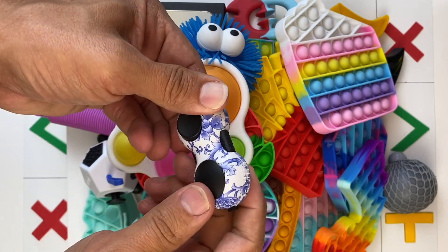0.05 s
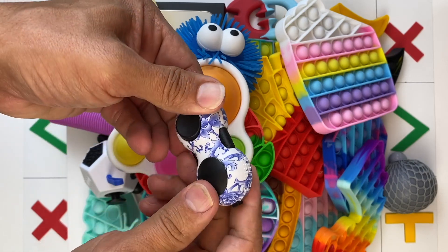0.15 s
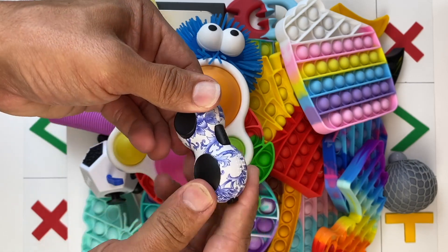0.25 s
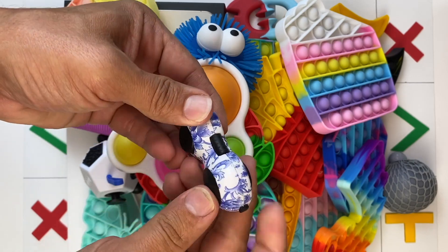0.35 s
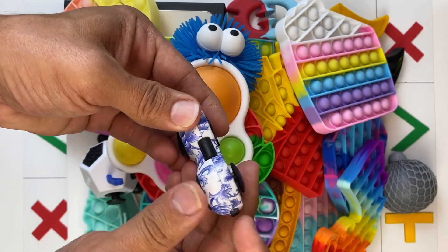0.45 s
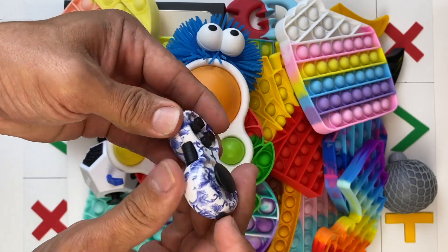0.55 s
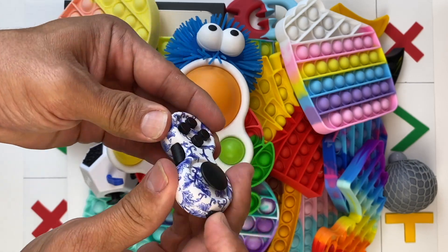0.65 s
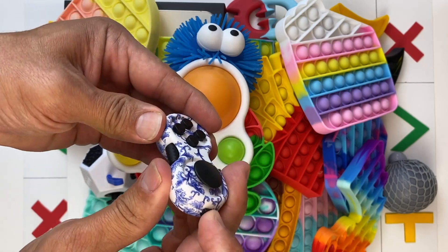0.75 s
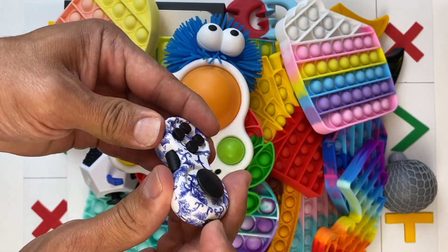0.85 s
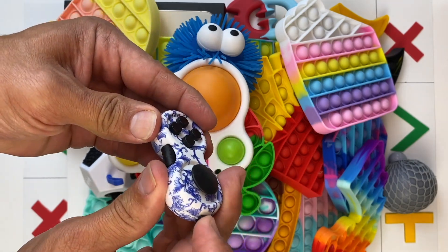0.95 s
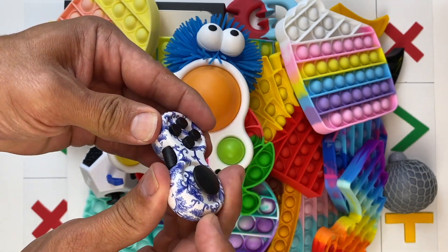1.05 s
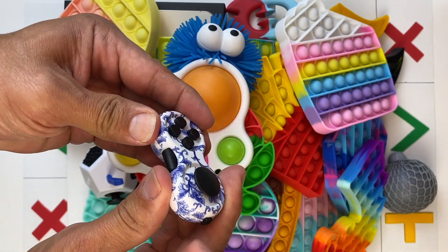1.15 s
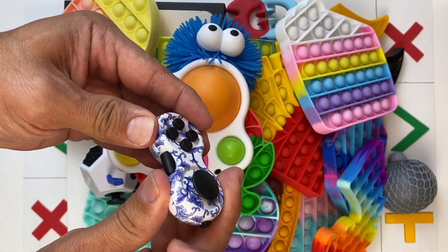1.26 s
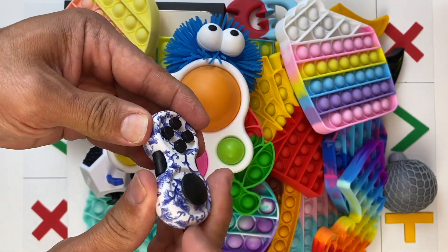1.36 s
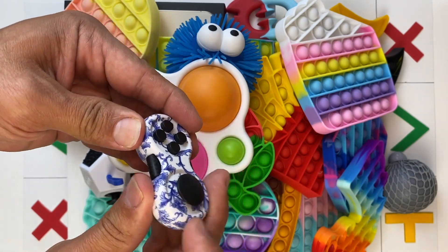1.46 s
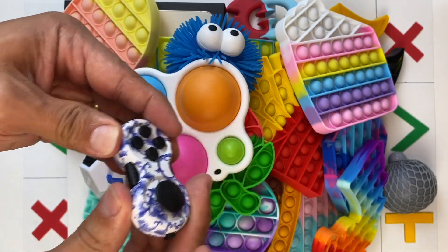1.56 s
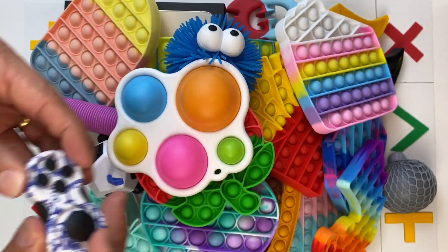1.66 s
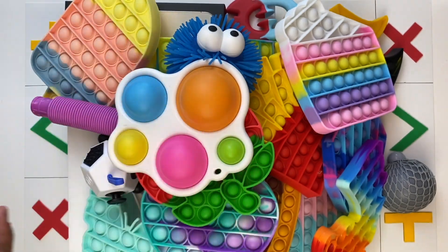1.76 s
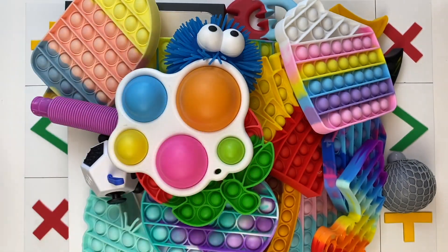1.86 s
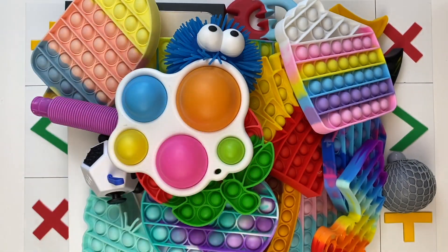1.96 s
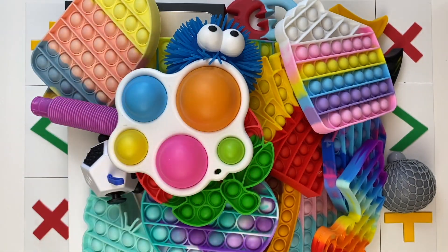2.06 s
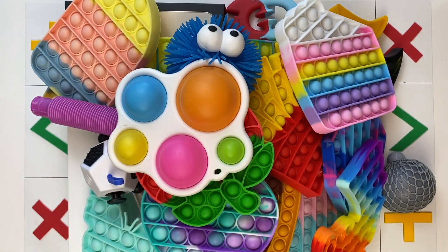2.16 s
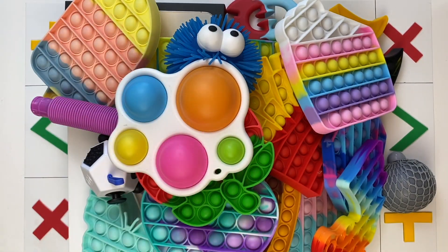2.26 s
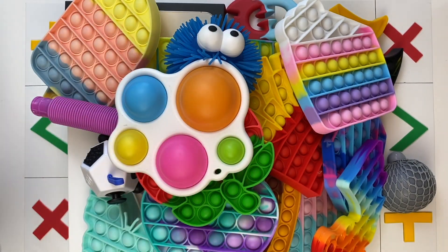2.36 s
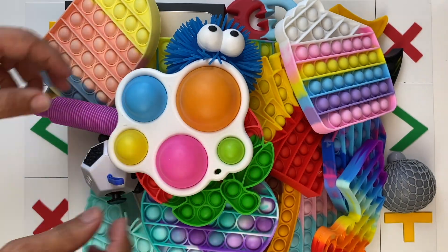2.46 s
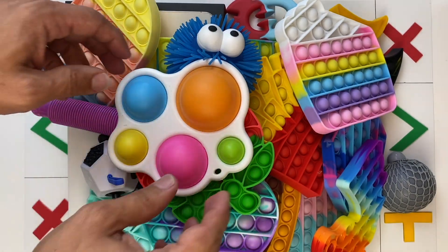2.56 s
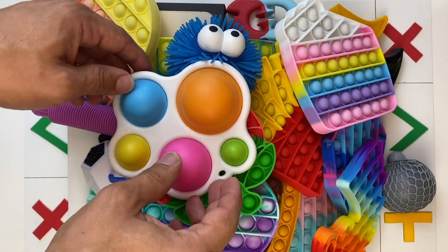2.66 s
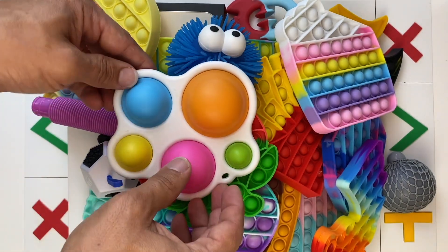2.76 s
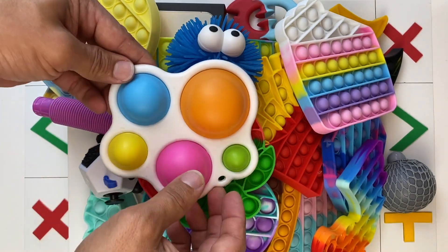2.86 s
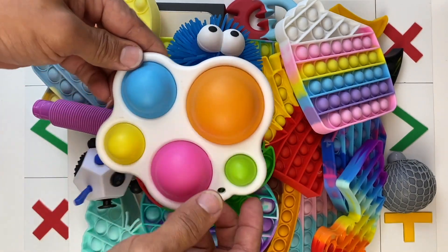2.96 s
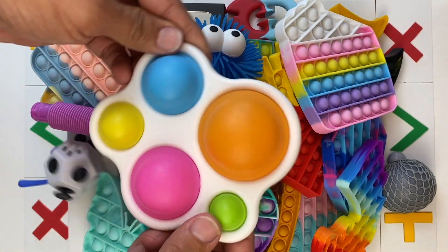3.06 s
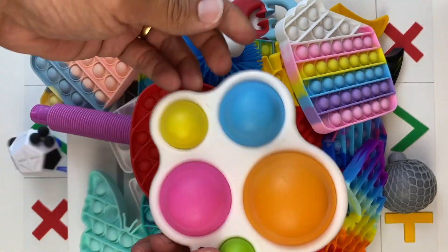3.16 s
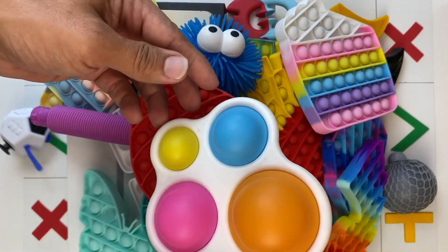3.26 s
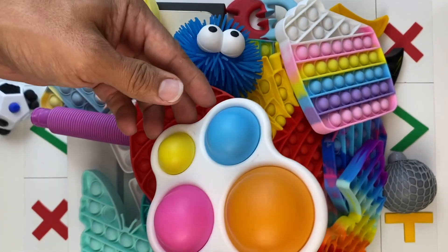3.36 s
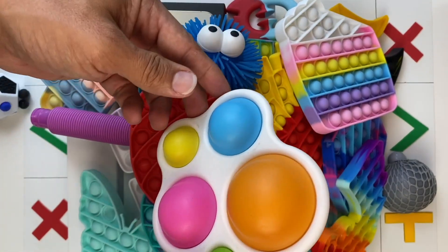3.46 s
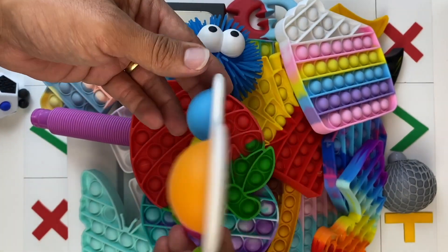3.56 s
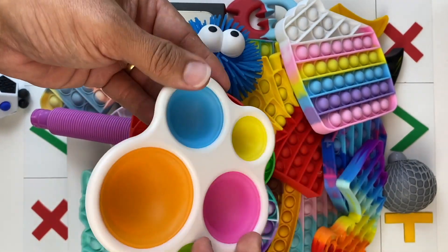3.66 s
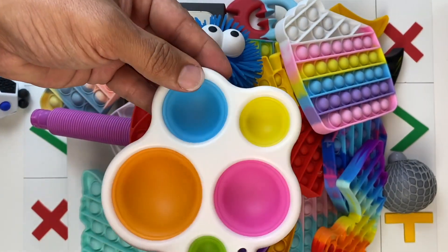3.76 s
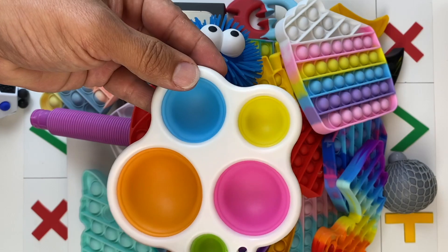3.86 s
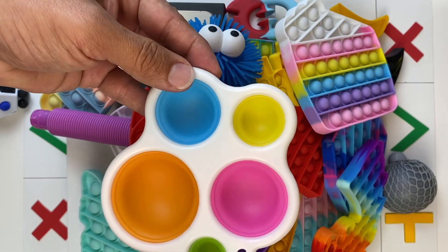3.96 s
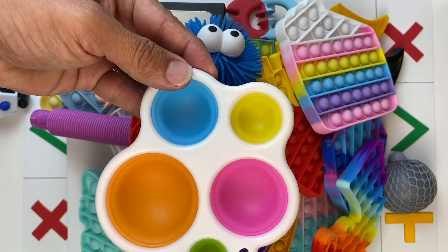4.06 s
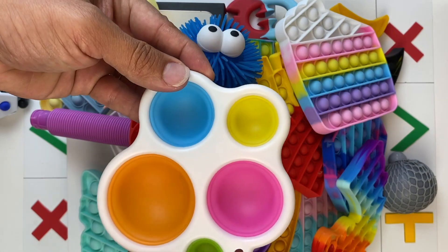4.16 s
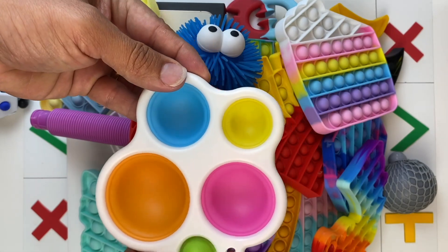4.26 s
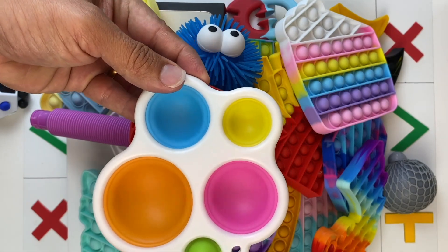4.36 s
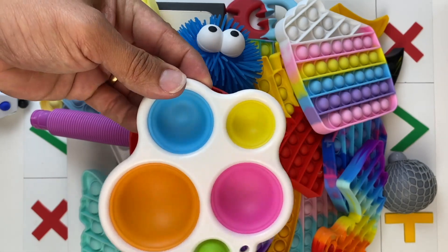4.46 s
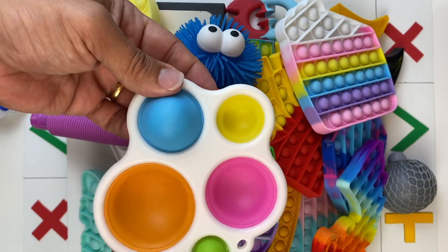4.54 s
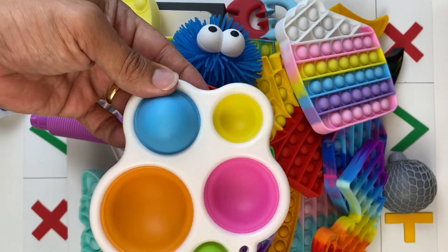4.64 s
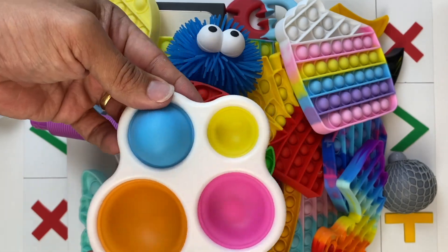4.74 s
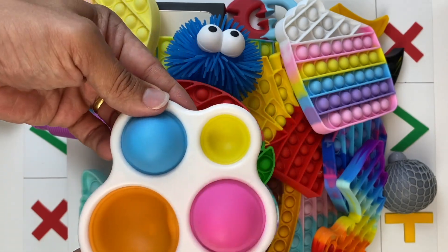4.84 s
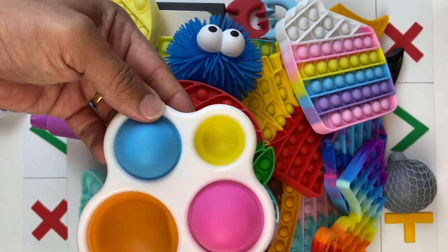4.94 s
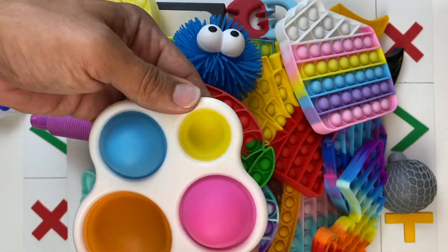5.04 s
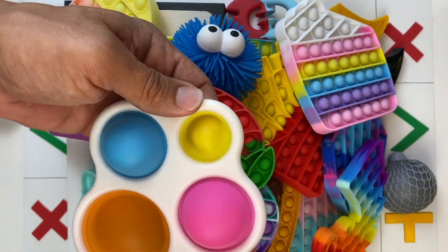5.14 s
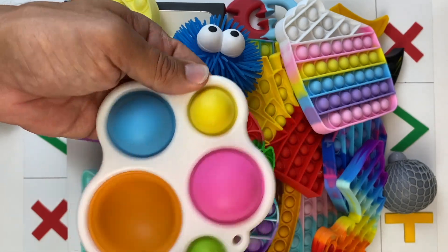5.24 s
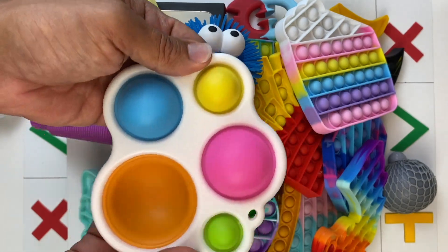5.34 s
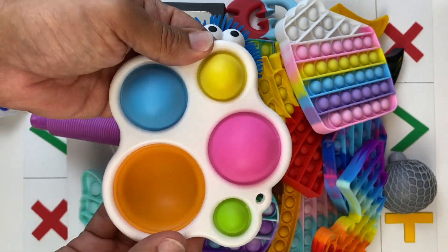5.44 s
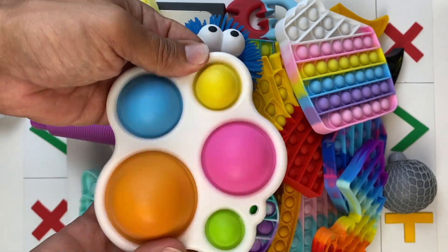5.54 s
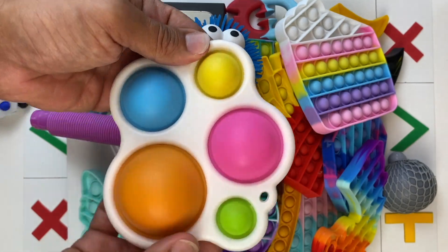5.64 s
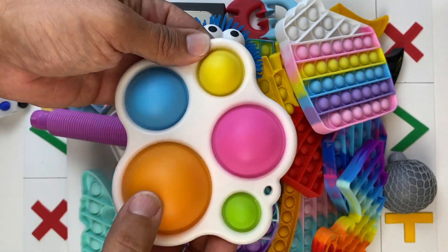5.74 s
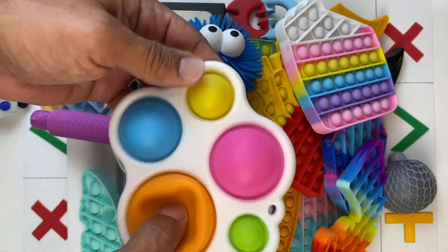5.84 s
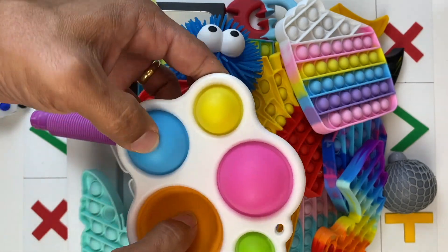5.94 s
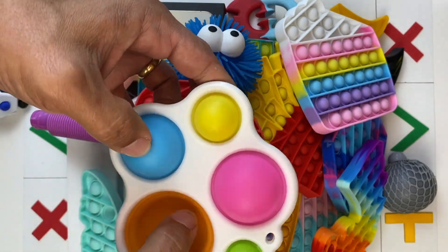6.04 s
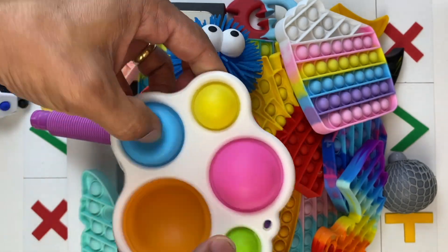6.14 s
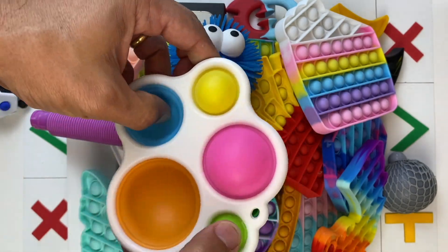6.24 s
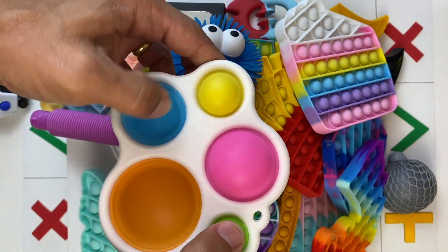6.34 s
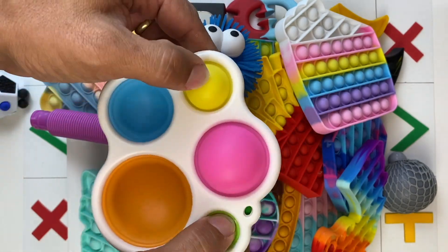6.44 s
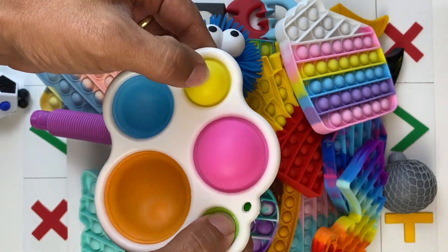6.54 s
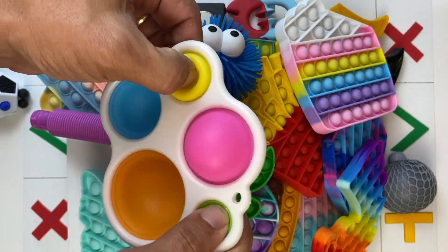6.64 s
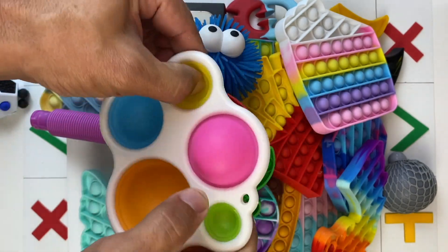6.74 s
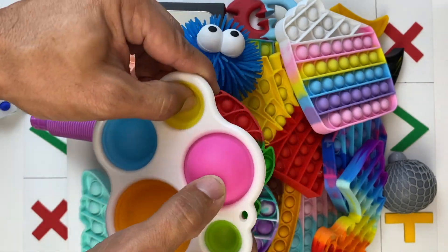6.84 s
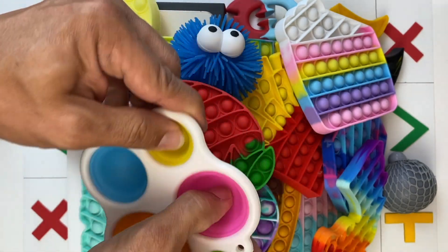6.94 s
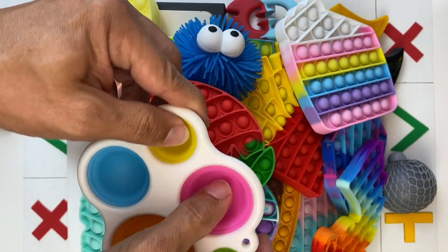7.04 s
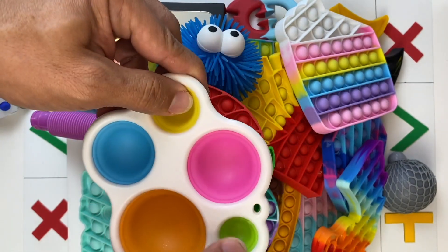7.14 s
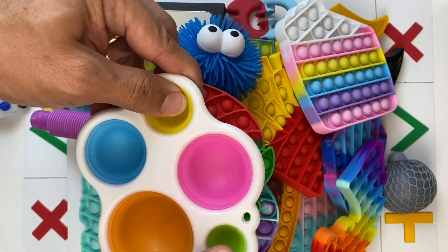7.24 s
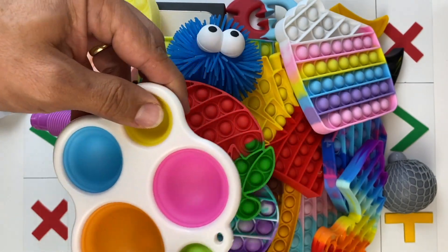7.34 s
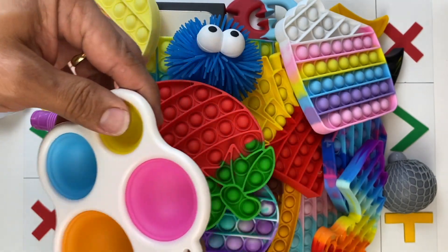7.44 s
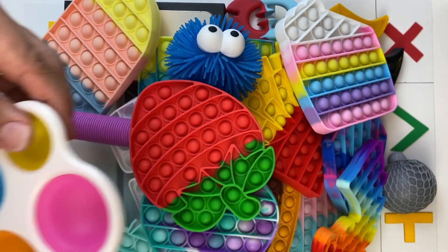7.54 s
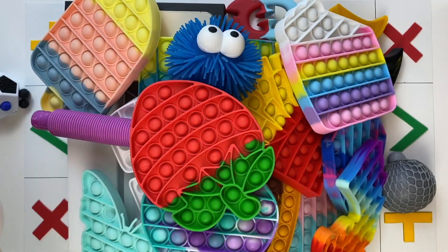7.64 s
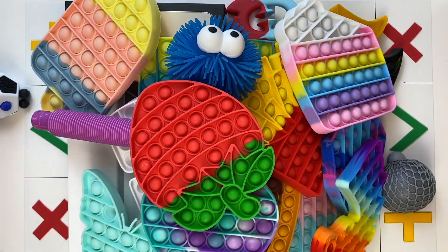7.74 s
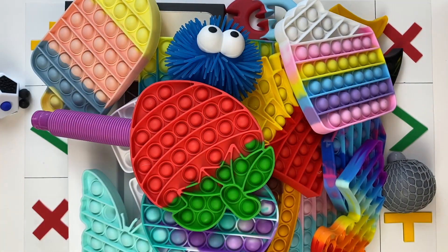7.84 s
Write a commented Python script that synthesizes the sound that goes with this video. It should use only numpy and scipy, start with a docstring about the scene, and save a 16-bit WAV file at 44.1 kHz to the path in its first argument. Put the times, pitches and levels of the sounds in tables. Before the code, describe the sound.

Close clicks and a loud hollow plastic clatter on a tabletop, followed by a run of crisp silicone popper pops.

```python
"""Fidget toys on a table, close up

Hands work plastic toys just under a stereo microphone in a small, quiet room with a faint hum.
A hard clicker ticks, snaps and is set down; a hollow toy clatters onto the table, which rings.
Then silicone domes buckle one by one, each a falling chirp and a crack, the loudest overloading
the input. Grainy plastic scrapes and short dull ticks fall in between."""
import sys
import numpy as np
from scipy import signal
from scipy.fft import rfft, irfft
from scipy.io import wavfile
from scipy.ndimage import uniform_filter1d

SR = 44100
rng = np.random.default_rng(int(sys.argv[2]) if len(sys.argv) > 2 else 0)


def master(y):
    """Save y as 16-bit WAV."""
    cut = np.clip(np.atleast_2d(y).T, -1, 1)
    pcm = np.round(cut * 32767)  # scale
    wavfile.write(sys.argv[1], SR, pcm.astype(np.int16))


N = 348390

# room rumble and microphone hiss: (frequency [Hz], relative level [dB])
AIR_SPECTRUM = [(12, -63), (20, -36.5), (67, -15.5), (102, 7), (150, -21), (205, -9), (369, -21.5),
                (448, -15), (561, -23), (1450, -34), (7180, -40), (7810, -46), (11900, -41.5), (13700, -48),
                (16200, -72)]
# that noise across the stereo pair: (frequency [Hz], left-right likeness [0-1])
AIR_LIKENESS = [(60, 0.93), (200, 1), (500, 0.29), (1200, 0.067), (4000, .05)]
# wavering machine tones in the background: (pitch [Hz], resonator width [Hz], level [dB])
HUM_TONES = [(94, 14, -55.5), (88, 21, -57.5), (196, 6.9, -66.5), (480, 9.1, -77), (310, 8.6, -77.5)]
# a cleaner drone that swells late: (time [s], level [dB])
DRONE_SWELL = [(4.9, -64.5), (5.57, -63.5), (5.7, -54.5), (6.3, -53), (6.9, -49.5), (7.5, -57),
               (7.9, -55.5)]
# its overtones: (multiple of DRONE_HZ, relative level [dB])
DRONE_OVERTONES = [(2, -2.5), (3, -11), (4, -17)]
# hard plastic parts, close up: (time [s], peak [dB], pitch [Hz], snap over ring [dB], left over right [dB])
PLASTIC_TICKS = [(0.027, -46.5, 11100, 14, 0), (0.0876, -36.5, 10700, -6, -7), (0.1471, -53, 4540, 3, -2.5),
                 (0.189, -28.5, 4200, 3, -4), (0.2452, -36, 3650, 3, -1), (0.277, -41, 5200, -2, -4),
                 (0.315, -40, 3400, -7, -2), (0.329, -40, 5780, -1, -5), (0.397, -40, 6550, -1, -5),
                 (0.4203, -45, 4450, -13, -15), (0.466, -37.5, 8600, -1, -1), (0.485, -40.5, 3560, -13, 0),
                 (0.508, -41, 4960, -4, 1), (0.5235, -40, 4430, -8, -10), (0.5935, -46.5, 5190, 12, -5),
                 (0.7687, -55, 4800, -15, -3), (0.9506, -37, 7260, 15, -8), (1.0251, -45, 4830, -5, 1),
                 (1.0872, -9, 4900, 6, -4), (1.2046, -16.5, 5140, 10, -7.5), (1.3139, -28.5, 11000, 5, 3),
                 (1.3416, -9.5, 6900, 3.5, -4), (1.434, -26.5, 8440, 15, -3), (1.4638, -15, 7040, 8, -9.5),
                 (1.6196, -48, 3620, 8, 18), (1.7529, -42.5, 7760, -2, 4), (2.1041, -35.5, 7300, 8.5, 2.5),
                 (2.8194, -51, 1745, -16, -3), (2.9477, -27, 6510, -2, -4), (2.9743, -20, 8900, -9, -1),
                 (2.983, -27, 6800, -5, -1), (2.9946, -24.5, 7100, -5, 0), (3.0104, -27, 8950, -6, 3.5),
                 (3.0205, -19, 10990, -1, 1), (3.054, -9.5, 5017, 8, 0.5), (3.0684, -16, 4970, 6, 0),
                 (3.0809, -16.5, 6500, -5, -3), (3.0995, -22, 6730, -9, -5), (3.1537, 1, 5730, -1, 0.5),
                 (3.2111, -7, 3200, 14, 5), (3.3164, -18, 3590, 11, -6), (3.3284, -20, 6900, -3.5, 18),
                 (3.4002, -20.5, 8800, -7, -1), (3.4151, -12.5, 8240, -4.5, 4.5),
                 (3.4414, -17, 6440, -10, -6), (3.4594, -25, 6300, -11, -1.5),
                 (3.5324, -28.5, 6400, -9.5, -2), (3.7145, -37, 1597, -29.5, 6.5),
                 (3.8702, -47.5, 2040, -10, -8.5), (3.914, -54.5, 3870, -1.5, -2),
                 (3.9606, -50.5, 2140, -0.5, -9.5), (4.0194, -55, 1966, -2.5, -12),
                 (5.1552, -24, 6920, 3.5, -1.5), (5.8365, -33.5, 4790, 0, -1),
                 (7.3342, -48, 3900, 9, -14.5)]
# a bright, wide snap: (frequency [Hz], relative level [dB])
SNAP_SPECTRUM = [(120, -44.5), (200, -12), (1940, -33), (3130, -15.5), (3430, -8.5), (4770, -4),
                 (8120, -6.5), (8740, -5), (11700, -6), (14600, -11), (16000, -40.5)]
# noisy sounds just under the microphone: (frequency [Hz], left-right likeness [0-1])
CLOSE_LIKENESS = [(350, 1), (1000, 0.8), (3000, 0.76), (5000, 0.17), (9000, 0.35)]
# grainy plastic scraping: fingers sliding, and the toy's blurred clatter as it tumbles:
# (loudest time [s], 20 dB rise [s], 20 dB fall [s], level [dB], centre [Hz])
PLASTIC_SCRAPES = [(.09, .008, .065, -63, 6500), (.196, 0.093, 0.027, -54.5, 4270),
                   (0.335, 0.2, .02, -58, 4600), (.392, 0.028, 0.21, -59.5, 4800),
                   (.596, 0.0087, 0.022, -56, 4580), (.948, 0.011, 0.032, -52, 5600),
                   (1.071, .09, 0.013, -63, 4800), (1.55, .01, .05, -67, 6600),
                   (1.637, 0.05, 0.093, -59.5, 3650), (1.756, 0.028, .06, -65, 7300),
                   (1.846, 0.09, 0.37, -70, 4300), (2.108, 0.04, 0.065, -53.5, 1610),
                   (2.6, 0.17, 0.13, -70.5, 3000), (2.8, .4, 0.063, -69.5, 1980),
                   (2.957, .006, .045, -46, 7100), (2.972, 0.012, 0.11, -36, 7060),
                   (3.34, 0.046, 0.099, -32.5, 6800), (3.435, 0.052, 0.061, -33, 6500),
                   (3.67, 0.032, 0.019, -57.5, 2800), (3.72, 0.042, .025, -50.5, 1900),
                   (3.79, .02, 0.022, -59.5, 6530), (3.864, .055, .3, -71, 3200),
                   (4.1, .04, 0.33, -70, 3240), (4.3, 0.0095, .06, -62, 2300),
                   (4.398, 0.042, 0.021, -61.5, 2820), (4.45, 0.027, 0.024, -53, 2150),
                   (4.631, 0.013, 0.067, -52.5, 2390), (4.769, 0.022, .01, -62, 3200),
                   (5.2, 0.0086, 0.063, -60, 2400), (5.3, .03, .05, -55, 3300),
                   (5.37, 0.051, .04, -56.5, 3300), (5.41, 0.028, .02, -59.5, 2110),
                   (5.47, 0.034, 0.039, -60, 3300), (5.705, .01, .04, -60, 2040),
                   (5.79, .026, .06, -51, 2600), (6.42, 0.062, 0.066, -59, 3480),
                   (6.47, 0.068, .05, -64, 2460), (6.63, 0.055, 0.0086, -58.5, 2300),
                   (6.75, 0.0097, 0.025, -58, 1970), (6.81, 0.019, 0.045, -66, 2070),
                   (7.099, 0.0091, 0.072, -49, 1980), (7.375, 0.048, 0.12, -53.5, 2300),
                   (7.606, 0.085, .085, -62.5, 2800)]
# toy hitting the table: (time [s], knock [dB], knock pitch [Hz], rattle [dB], table ring [dB],
# hardness as tilt [dB/octave], mode favoured by the spot [Hz])
TOY_BOUNCES = [(2.088, -37.5, 810, -59, -43.5, -0.5, 835), (2.104, -37.5, 1220, -57, -33, -11, 1145),
               (2.111, -33, 970, -61, -36.5, 10, 178), (2.974, -40.5, 1340, -41, -39, -3, 178),
               (3.0375, -8.5, 1360, -20, -6.5, -4, 177), (3.1545, -4.5, 2897, 1, 2.5, -1, 295.4),
               (3.17, -7, 1346, -9, -13, 3.5, 428), (3.186, -16, 2880, -12, -18, -3, 428),
               (3.2125, -6.5, 1080, -13.5, 1.5, -0.5, 430), (3.3145, -3, 925, -22, 1, 5.5, 500),
               (3.369, -20, 905, -25, -7.5, 1.5, 428), (3.40, -23, 915, -28, -12.5, 3.5, 835),
               (3.4225, -15.5, 920, -20.5, -8, 7, 825), (3.445, -16, 840, -50, -14, 6, 835),
               (3.5125, -25, 940, -48, -19.5, 4.5, 500), (7.277, -51.5, 870, -63, -40, -8, 132.4)]
# the toy's hollow shell: (frequency [Hz], relative level [dB])
SHELL_SPECTRUM = [(500, -24), (1500, -12), (2200, -5), (2900, -1), (3600, -3), (4000, -13), (7000, -15),
                  (12000, -22), (16000, -30)]
# modes of the table top: (frequency [Hz], relative level [dB], t60 [s])
TABLE_MODES = [(101, -17, 0.22), (130, -19.5, 0.035), (175.4, -10, 0.31), (272.7, -6.5, 0.15),
               (378, -22, .12), (430.9, -1, 0.1), (528, -7, 0.09), (610, -8.5, 0.21), (687, -9.5, 0.13),
               (825, -9.5, 0.13), (970, -8.5, 0.035), (1160, -17.5, 0.044), (1270, -16.5, 0.032),
               (1545, -22, 0.086), (2090, -26.5, 0.042)]
# short dull ticks: fingertips on silicone, and one loud crack as a dome gives:
# (time [s], peak [dB], left over right [dB])
DULL_TICKS = [(3.697, -38.5, -0.5), (4.3365, -45.5, 0), (4.3912, -43.5, 0.5), (4.6547, -38, -1.5),
              (4.6974, -49, 1.5), (5.0842, -46.5, -1.5), (5.1557, -15, -1.5), (5.2708, -32.5, -2),
              (5.287, -28, -3), (5.4249, -38, 1), (5.7036, -39.5, 0), (5.7705, -42, 0), (6.3998, -38, -2),
              (6.4344, -47.5, -1.5), (6.5676, -59, -1), (6.793, -49.5, 0), (7.1357, -36, -3),
              (7.2774, -42.5, -3.5)]
# their tone: (frequency [Hz], relative level [dB])
DULL_SPECTRUM = [(500, -22), (1200, -9.5), (2200, 0), (3500, 0.5), (4800, -3.5), (6000, -14.5),
                 (10000, -20), (16000, -28)]
# domes snapping through, often a faint give just before the full flip: (time [s], level [dB],
# first pitch [Hz], last pitch [Hz], decay [s], relative crack [dB], room send [dB],
# frame mode left most free by the grip [Hz])
DOME_POPS = [(4.1878, -9.5, 2140, 200, 0.0052, 8.5, -13, 3700),
             (4.4712, -11.5, 952, 568, .0019, -13.5, -16.5, 700),
             (4.4905, 3, 2080, 463, 0.0019, -5, -13, 700), (4.782, -25, 1830, 1000, 0.0003, -10, 0.5, 2000),
             (4.7988, 5, 2820, 510, 0.0018, 4.5, -10, 717),
             (5.1238, -20, 1500, 460, 0.0041, -0.5, -13.5, 886),
             (5.1578, -5, 1190, 216, 0.0011, -10.5, -13, 800),
             (5.4975, -7.5, 1200, 331.4, .0028, -2.5, -14.5, 620),
             (5.505, 5, 2000, 478, 0.0022, -2.5, -14.5, 1900),
             (5.821, -24, 466, 148.4, .0088, -9, -22, 620),
             (5.8432, 4.5, 2640, 419, 0.0021, 5, -10.5, 1500),
             (6.1468, -9.5, 1300, 890, 0.00071, -21.5, -24.5, 1500),
             (6.1562, 2.5, 2480, 505, 0.0022, 1.5, -12.5, 3700),
             (6.6455, -7, 1360, 805, .00037, -16, -10, 2000),
             (6.6615, -17, 1480, 175, 0.0062, -10.5, -10.5, 2000),
             (6.8938, -12.5, 1631, 491.5, 0.0022, -17, -7, 1500),
             (6.9032, 7.5, 2560, 463, 0.0014, 2.5, -12.5, 2000)]
# the crack of a dome's rim: (frequency [Hz], relative level [dB])
CRACK_SPECTRUM = [(300, -1.5), (1500, 4.5), (3500, 4), (5000, -0.5), (7000, -11.5), (12000, -23),
                  (16000, -25.5)]
# plastic frame round the domes: (frequency [Hz], width [Hz], relative level [dB])
FRAME_MODES = [(590, 170, 0.5), (810, 120, -3), (1500, 230, -1.5), (1990, 370, -3.5), (2407, 200, -22),
               (3710, 240, -3.5), (4740, 280, -13)]
# the small room's decay: (frequency [Hz], t60 [s])
ROOM_DECAY = [(100, 0.6), (300, 0.36), (800, 0.37), (2000, 0.41), (5000, 0.36), (9000, 0.36), (13000, 0.21),
              (16000, 0.29)]
# tone of its reflections: (frequency [Hz], relative level [dB])
ROOM_SPECTRUM = [(60, -8), (300, -3.5), (1000, -4.5), (4000, -1.5), (10000, 2), (16000, -0.5)]
# reflections at the microphone: (frequency [Hz], left-right likeness [0-1])
ROOM_LIKENESS = [(100, 1), (300, .93), (650, 0.3), (1400, 0.067), (3000, 0.24), (10000, 0.029)]

AIR_DB, DRONE_HZ = -57.5, 112
TICK_ROOM_DB, BOUNCE_ROOM_DB, DULL_ROOM_DB = -7.5, -3, -12.5
LOW_CUT_HZ, CLIP_LEVEL, HIGH_CUT_HZ = 75, .97, 16300


def amp(db):
    return 10 ** (np.asarray(db) / 20)


def unit_rms(x):
    return x / np.sqrt(np.mean(x ** 2) + 1e-20)


def unit_peak(x):
    return x / abs(x).max()


def curve_at(points, hz):
    f, value = np.transpose(points)
    return np.interp(np.log(hz + 1), np.log(f + 1), value)


def add(mix, start_s, sound):
    part = mix[..., round(start_s * SR):][..., :sound.shape[-1]]
    part += sound[..., :part.shape[-1]]


def pan(sound, db):
    return sound * amp([[db / 2], [-db / 2]])


def stereo_pair(left, other, likeness):
    """Left and right from two unrelated noises, as alike as asked."""
    return np.array([left, likeness * left + np.sqrt(1 - likeness ** 2) * other])


def resonate(x, hz, width):
    """One resonance: shifts hz down to zero, smooths, and shifts back."""
    carrier = np.exp(2j * np.pi * np.cumsum(hz * np.ones(len(x))) / SR)
    pole = np.exp(-np.pi * width / SR)
    return 2 * (carrier * signal.lfilter([1 - pole], [1, -pole], x / carrier)).real


def close_noise(spectrum, size):
    """Coloured noise at close range; left and right differ more in the treble."""
    hz = np.fft.rfftfreq(size, 1 / SR)
    pair = stereo_pair(*rfft(rng.standard_normal((2, size))), curve_at(CLOSE_LIKENESS, hz))
    return unit_rms(irfft(pair * amp(curve_at(spectrum, hz)), size))


def room_air():
    """Room rumble and microphone hiss, wavering slightly in patches of time and frequency."""
    frames, hz = N // 256 + 5, np.fft.rfftfreq(1024, 1 / SR)
    a, b, c, d, patches = rng.standard_normal((frames, 513, 5)).T
    patches = unit_rms(uniform_filter1d(uniform_filter1d(patches, size=8, axis=0), size=20, axis=1))
    bands = stereo_pair(a + 1j * b, c + 1j * d, curve_at(AIR_LIKENESS, hz)[:, None])
    bands *= amp(curve_at(AIR_SPECTRUM, hz)[:, None] + 2 * patches)
    return amp(AIR_DB) * unit_rms(signal.istft(bands, nperseg=1024, noverlap=768)[1][:, :N])


def machine_hum():
    """Fuzzy machine tones in the background, and a cleaner drone that swells towards the end."""
    fuzzy = sum(amp(db) * unit_rms(resonate(resonate(rng.standard_normal(N), hz, width), hz, width))
                for hz, width, db in HUM_TONES)
    t = np.arange(N) / SR
    drone = sum(amp(db) * np.sin(2 * np.pi * k * DRONE_HZ * t) for k, db in DRONE_OVERTONES)
    swell = amp(np.interp(t, *np.transpose(DRONE_SWELL)))
    return fuzzy + np.sqrt(2) * swell * drone


def plastic_tick(db, hz, snap_db, pan_db):
    """A wide snap plus the short ring of a small part; harder and higher ticks last longer."""
    t = np.arange(3000) / SR
    t60 = .03 * np.exp(.005 * (db + 30) + .1 * np.log2(hz / 5000))
    ring = unit_rms(np.array([resonate(side, hz, .042 * hz) for side in rng.standard_normal((2, len(t)))]))
    snap = amp(snap_db) * close_noise(SNAP_SPECTRUM, len(t))
    envelope = amp(-60 * t / t60) * (1 - np.exp(-t / .00061))
    return pan(amp(db) * unit_peak((snap + ring) * envelope), pan_db)


def plastic_scrape(top_s, rise_s, fall_s, db, hz):
    """Sliding fingers or the toy's blurred clatter: a grainy hiss that swells and dies."""
    start_s, end_s = max(top_s - 1.5 * rise_s, 0), top_s + 1.5 * fall_s
    t = np.arange(start_s, end_s, 1 / SR)
    swell_db = np.interp(t, [start_s, top_s, end_s], [db - 20 * (top_s - start_s) / rise_s, db, db - 30])
    onsets = rng.random(len(t)) < 160 / SR  # about 160 a second
    grains = onsets * amp(2.9 * np.minimum(rng.exponential(1, len(t)), 3))
    roughness = .5 + signal.lfilter([1], [1, -np.exp(-1 / (.0054 * SR))], grains)
    noise = rng.standard_normal((2, len(t))) * roughness
    noise[1] = .5 * noise[0] + .88 * noise[1]  # the two sides are partly alike
    wide = signal.sosfilt(signal.butter(2, [1500, 13000], "band", fs=SR, output="sos"), noise)
    focused = np.array([resonate(resonate(side, hz, width=2400), hz, width=2400) for side in wide])
    hiss = unit_rms(unit_rms(focused) + .29 * unit_rms(wide))
    return start_s, amp(swell_db) * hiss * signal.windows.tukey(len(t), .1)


def toy_bounce(knock_db, knock_hz, rattle_db, ring_db, tilt_db, spot_hz):
    """The hollow toy knocks and rattles; the table top rings, its low modes arriving last."""
    t = np.arange(16000) / SR
    cycles = knock_hz * .012 * (1 - np.exp(-t / .011))  # bending waves smear into a falling pitch
    knock = unit_peak(np.sin(2 * np.pi * cycles) * t * np.exp(-t / .0021))
    rattle_envelope = (1 - np.exp(-t / .00099)) * (amp(-60 * t / .013) + .28 * amp(-60 * t / .19))
    rattle = unit_peak(close_noise(SHELL_SPECTRUM, len(t)) * rattle_envelope)
    hz, db, t60 = np.transpose(TABLE_MODES)[:, :, None]
    octaves = np.log2(hz / spot_hz)
    spot_db = 4.9 * np.exp(-(octaves / .79) ** 2)
    gains = amp(db + tilt_db * octaves + spot_db + 1.7 * rng.standard_normal(hz.shape))
    envelopes = amp(-60 * t / t60) * (1 - np.exp(-t * hz / .27))
    modes = gains * envelopes * np.sin(2 * np.pi * (hz * t + rng.random(hz.shape)))
    ring = modes.sum(0) / np.linalg.norm(gains)
    return amp(knock_db) * knock + amp(ring_db) * ring + amp(rattle_db) * rattle


def dull_tick(db, pan_db, t60=.0083):
    """A few milliseconds of dull noise: a fingertip on silicone, or a crack as a dome gives."""
    t = np.arange(1000) / SR
    envelope = amp(-60 * t / t60) * (1 - np.exp(-t / .0004))
    return pan(amp(db) * unit_peak(close_noise(DULL_SPECTRUM, len(t)) * envelope), pan_db)


def dome_pop(db, first_hz, last_hz, decay_s, crack_db):
    """The buckling wave runs outward, so its pitch falls in milliseconds; the rim cracks as it flips."""
    t = np.arange(3000) / SR - .002  # the dome flips at t = 0
    after = np.maximum(t, 0)
    glide_s = 1.7 / first_hz
    hz = last_hz + (first_hz - last_hz) * np.exp(-after / glide_s)
    swing = (1 - np.exp(-after / .00021)) * np.exp(-after / decay_s)
    chirp = swing * np.sin(2 * np.pi * np.cumsum(hz * (t > 0)) / SR)
    crack_envelope = np.exp(np.minimum((t - .0008) / .0021, -(t - .0008) / .0012))
    crack = close_noise(CRACK_SPECTRUM, len(t)) * crack_envelope
    crack += close_noise(SNAP_SPECTRUM, len(t)) * np.exp(-abs(t - .001) / .00024)  # brightest instant
    thump = np.sin(2 * np.pi * 165 * after) * after * np.exp(-after / .0019)
    thump_db = -20 - 6.5 * np.log2(last_hz / 450)  # deeper domes move more air
    shake = rng.standard_normal(len(t)) * after * np.exp(-after / .0049)
    frame = sum(amp(mode_db) * resonate(shake, f, width) for f, width, mode_db in FRAME_MODES)
    frame_db = -14 + .71 * crack_db  # a harder crack shakes the frame more
    layers = [(0, chirp), (crack_db, crack), (thump_db, thump), (frame_db, frame)]
    return amp(db) * sum(amp(layer_db) * unit_peak(layer) for layer_db, layer in layers)


def frame_radiation(click, free_hz):
    """The frame radiates a pop into the room through its modes, favouring the one the grip leaves free."""
    click = np.pad(click, (0, 1500))
    ring = 0
    for hz, width, db in FRAME_MODES:
        free_db = 3.7 * np.exp(-(np.log2(hz / free_hz) / .17) ** 2)
        ring += amp(db + free_db) * resonate(click, hz, width)
    return .75 * click + .86 * ring


def wall_click(sound):
    """What reaches the walls from all sides at once: one click with the sound's smoothed colour."""
    running_power = np.cumsum(abs(rfft(sound[0], 8192)) ** 2)
    bins = np.arange(len(running_power))
    low, high = bins / 1.08 - 3, bins * 1.08 + 3
    band_power = np.interp(high, bins, running_power) - np.interp(low, bins, running_power)
    click = irfft(np.sqrt(band_power / (high - low)))
    return np.roll(click, 256)[:512] * np.hanning(512)


def small_room(x):
    """Reflections off near walls, each band dying at its own speed; the bass is alike on both sides."""
    taps = np.zeros((2, 24000))
    arrivals = np.arange(260, 23980, 20) + rng.integers(0, 20, (2, 1186))
    np.put_along_axis(taps, arrivals, rng.choice([-1., 1.], arrivals.shape), axis=1)
    hz, t, sides = signal.stft(taps, SR, nperseg=512)
    hz = hz[:, None]
    bands = stereo_pair(*sides, curve_at(ROOM_LIKENESS, hz))
    bands *= amp(curve_at(ROOM_SPECTRUM, hz) - 60 * t / curve_at(ROOM_DECAY, hz))
    tail = signal.istft(bands, SR, nperseg=512)[1]
    return signal.fftconvolve(x[None], tail / np.linalg.norm(tail[0]), axes=1)[:, :N]


def scene():
    """Hands and toys right at the microphone; reflections, air and hum behind them."""
    close, walls = np.zeros((2, N)), np.zeros((3, N))  # three spots in the room, so that tails differ
    for k, (s, *row) in enumerate(PLASTIC_TICKS):
        tick = plastic_tick(*row)
        add(close, s, tick)
        add(walls[k % 3], s - .004, amp(TICK_ROOM_DB) * wall_click(tick))
    for row in PLASTIC_SCRAPES:
        add(close, *plastic_scrape(*row))
    for k, (s, *row) in enumerate(TOY_BOUNCES):
        bounce = toy_bounce(*row)
        add(close, s, bounce)
        add(walls[k % 3], s, amp(BOUNCE_ROOM_DB) * bounce[0])
    for k, (s, *row) in enumerate(DULL_TICKS):
        tick = dull_tick(*row)
        add(close, s, tick)
        add(walls[k % 3], s - .004, amp(DULL_ROOM_DB) * wall_click(tick))
    for k, (s, *row, room_db, free_hz) in enumerate(DOME_POPS):
        pop = dome_pop(*row)
        add(close, s - .002, pop)
        add(walls[k % 3], s - .004, amp(room_db) * frame_radiation(wall_click(pop), free_hz))
    return close + sum(small_room(spot) for spot in walls) + room_air() + machine_hum()


def record(dry):
    """The microphone loses the deep bass, the input clips, and the top of the treble is cut."""
    heard = signal.sosfilt(signal.butter(2, LOW_CUT_HZ, "high", fs=SR, output="sos"), dry)
    clipped = np.clip(heard, -CLIP_LEVEL, CLIP_LEVEL)
    high_cut = signal.firwin(255, HIGH_CUT_HZ, window=("kaiser", 7), fs=SR)
    return signal.oaconvolve(clipped, high_cut[None], "same")


dry = scene()
out = record(dry)
master(out)
```